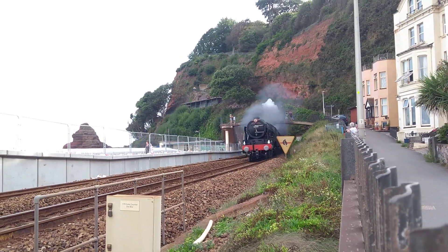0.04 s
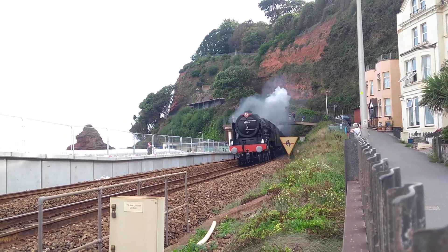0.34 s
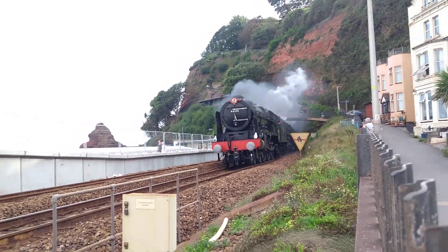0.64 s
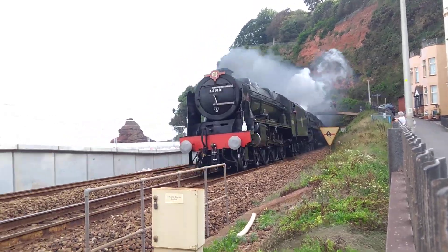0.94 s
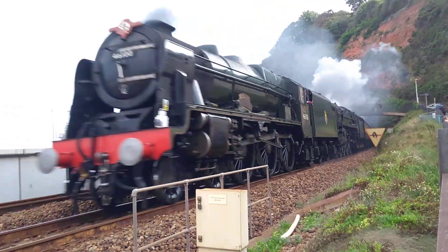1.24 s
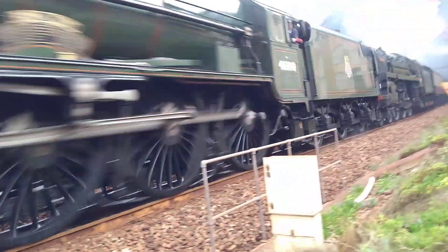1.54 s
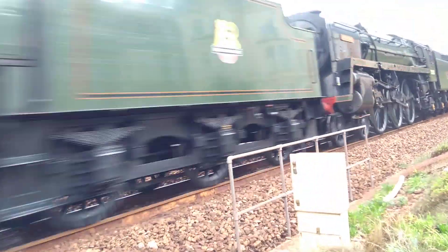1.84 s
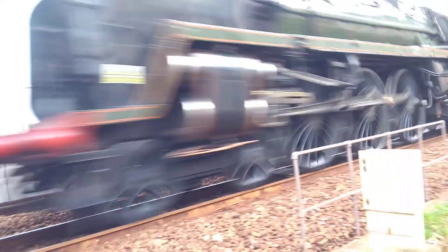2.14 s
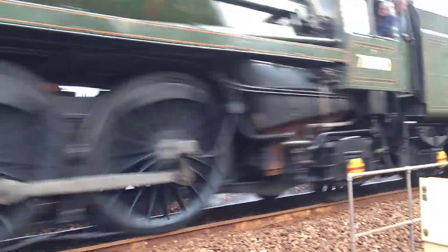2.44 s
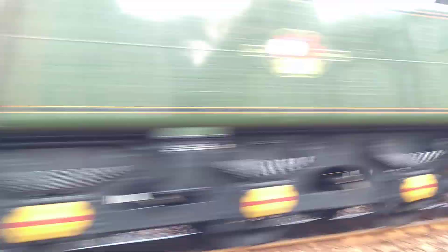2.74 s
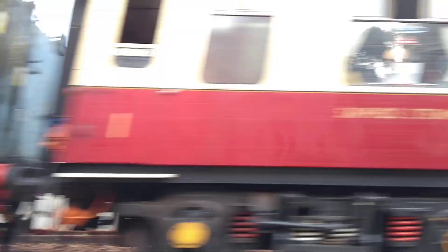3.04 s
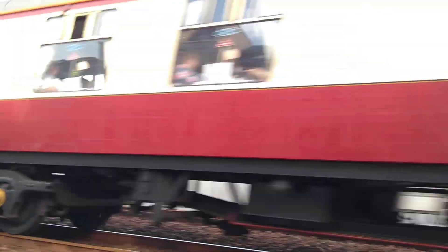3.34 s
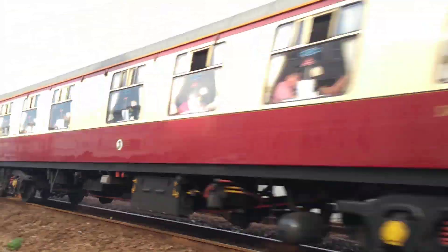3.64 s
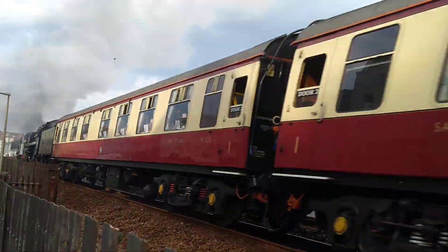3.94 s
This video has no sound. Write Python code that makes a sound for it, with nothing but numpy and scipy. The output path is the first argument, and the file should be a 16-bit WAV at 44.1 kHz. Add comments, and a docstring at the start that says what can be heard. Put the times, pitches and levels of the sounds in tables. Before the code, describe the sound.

A steam train passes close by, with a dense wheel roar, low rumble and surging steam hiss throughout. Rapid chuffs and a faint hum lead until about 1.3 seconds. The engines then rush past, mostly on the left, with rattling rods and sharp clanks up to about 2.3 seconds. From around 2.8 seconds a coach follows, its wheels clanking and ringing, the highest tones falling slightly in pitch.

```python
"""Two steam engines at the lineside

Coupled engines and their first coach rush past, a few metres from a hand-held stereo recorder.
Chimney beats and a faint hum come ahead of the train; then wheels roar on the rails, running gear
clanks and steam hisses in surges. Heavy frames rumble by, mostly on the left microphone, and the
highest rings of the coach wheels fall in pitch as they pass."""
import sys
import numpy as np
from scipy.fft import rfft, irfft
from scipy.io import wavfile

SR = 44100
rng = np.random.default_rng(int(sys.argv[2]) if len(sys.argv) > 2 else 0)


def to_wav(s):
    """Save 16-bit WAV."""
    ch = np.atleast_2d(s).T  # columns
    pcm = np.round(np.clip(ch, -1, 1) * 32767)  # PCM
    wavfile.write(sys.argv[1], SR, pcm.astype(np.int16))


N = 176400
TIME = np.arange(N) / SR
BIN_HZ = np.maximum(np.arange(N // 2 + 1) * SR / N, 1)

# Levels are relative, spectra give level per hertz, and pan is left minus right.
# wheels on the rails, from the lineside: (time [s], level [dB], pan [dB])
ROAR_PASS = [(0, -23, 8), (.12, -27, 4), (.3, -20.5, 3), (.53, -27, 2), (.75, -23, 2), (.97, -22.5, 1),
             (1.1, -21, 0.5), (1.42, -19.5, 3), (1.65, -18, 5), (1.85, -19, 6), (2.1, -21, 7.5),
             (2.4, -20.5, 3), (2.8, -21, 5.5), (3.0, -21.5, 5), (3.25, -18.5, 3.5), (3.5, -19, -0.5),
             (3.75, -20.5, -2.3), (3.87, -20, -4), (4, -20, -3)]
# centre of the roar: (time [s], frequency [Hz])
ROAR_CENTRE = [(0, 642.2), (1.3, 629), (1.75, 610), (2.4, 640.8), (3.0, 675.6), (4, 689)]
# the roar while centred on ROAR_REFERENCE_HZ: (frequency [Hz], level [dB])
ROAR_SPECTRUM = [(200, -22), (330, -15), (400, -9), (470, -3.5), (540, -0.5), (625, 0), (740, -5.5),
                 (880, -5), (1000, -8.5), (1120, -16.5), (1600, -25), (3000, -54)]
ROAR_REFERENCE_HZ = 640.7
# the coach is heard more directly than the engines: (time [s], left-right likeness [0-1])
ROAR_DIRECTNESS = [(0, 0.18), (2.4, 0.4), (3.2, 0.61), (4, 0.71)]

# rattle of rods and bogies: (time [s], level [dB]) and (frequency [Hz], level [dB])
RATTLE_PASS = [(0, -33), (.14, -33.5), (.28, -30.5), (.56, -33), (.75, -27.5), (1.0, -28.5), (1.5, -29),
               (1.64, -24), (1.72, -31), (1.95, -23), (2.06, -29), (2.16, -21), (2.26, -29.5),
               (2.42, -25.5), (2.76, -27.5), (3.22, -26), (3.4, -28.5), (3.65, -28), (4, -28.5)]
RATTLE_SPECTRUM = [(600, -39), (1100, -2), (1400, -2.5), (1800, 1), (2300, -3.5), (3200, -5.5), (6000, -38)]
# wheels strike the rails: (time [s], clank level [dB], clank decay [s], ring pitch [Hz], ring level [dB])
WHEEL_STRIKES = [(1.334, -19, 0.0091, 630, -19.5), (1.403, -19, 0.023, 550, -20.5),
                 (1.561, -14, 0.017, 840, -23), (1.624, -15, 0.032, 545, -16.5),
                 (1.694, -20, 0.0062, 545, -18), (1.728, -24, .02, 538, -15.5),
                 (1.818, -15.5, .019, 700, -23), (2.021, -22.5, 0.024, 650, -18),
                 (2.879, -16.5, 0.038, 630, -15.5), (3.049, -20.5, .021, 632, -18.5),
                 (3.231, -19, 0.023, 650, -22), (3.838, -15, .016, 660, -19.5),
                 (3.936, -15, .012, 700, -23), (3.972, -19, 0.019, 605, -19)]
# tone and position of the clanks: (frequency [Hz], level [dB]) and (time [s], pan [dB])
CLANK_SPECTRUM = [(120, -17.5), (350, -9.5), (600, 3), (850, -1), (1400, -23), (2200, -13), (6000, -47),
                  (14000, -37)]
STRIKE_PAN = [(1.3, 1), (2, 6), (3.2, 4.5), (3.8, -2)]
# coach wheel resonances: (width [Hz], rows of (time [s], frequency [Hz], level [dB]))
COACH_RESONANCES = [ (25, [(2.7, 1490, -54), (2.91, 1440, -32.5), (3.05, 1378, -25.5), (3.14, 1390, -36),
                    (3.24, 1375, -25), (3.35, 1330, -58)]), (14.1, [(3.2, 1240, -58), (3.36, 1217, -30),
                    (3.5, 1215, -39), (3.86, 1200, -30.5)]), (35, [(2.6, 880, -47), (2.95, 1011, -23.5),
                    (3.4, 1080, -55)]), (86, [(3, 680, -46), (3.25, 690.5, -27), (3.48, 745, -23.5),
                    (3.72, 730.3, -22.5), (3.87, 738.6, -19.5)])]

# escaping steam: (time [s], hiss level [dB], sizzle level [dB])
STEAM_SURGES = [(0, -29, -37), (.16, -29.5, -35), (.35, -27, -33), (.53, -30.5, -33), (.77, -25.5, -31.5),
                (.99, -28.5, -32), (1.22, -25.5, -30.5), (1.42, -26, -31), (1.48, -27.5, -34),
                (1.6, -27, -31.5), (1.71, -32, -34.5), (1.91, -25, -28), (2.05, -29, -32),
                (2.16, -25.5, -28), (2.28, -28.5, -34), (2.38, -26.5, -30.5), (2.62, -26, -29),
                (2.75, -27, -29.5), (2.84, -26.5, -26), (3.03, -29, -30.5), (3.1, -30, -32),
                (3.3, -29, -32.5), (3.4, -27, -28.5), (3.51, -31, -34), (3.68, -24.5, -29),
                (3.78, -30.5, -33.5), (4, -28.5, -32.5)]
# its hiss and the sizzle on top: (frequency [Hz], level [dB])
HISS_SPECTRUM = [(1000, 2), (2000, -9.5), (3200, 0), (4500, -1), (6200, -3), (8000, -6), (11000, -51),
                 (16000, -47)]
SIZZLE_SPECTRUM = [(4000, -67), (7000, -2.5), (9000, 0.5), (11800, 2.5), (13000, -2), (14200, -7.5),
                   (16000, -2)]
# chimney beats up the line: (level [dB]) of each in turn, and (frequency [Hz], level [dB])
BEAT_LEVELS = [-16, -22, -17, -20, -21, -16, -19, -16.5, -18, -19.5, -18.5]
BEAT_SPECTRUM = [(200, -20), (480, -6), (680, 1.5), (860, 5), (980, 1), (1200, -21), (3000, -34)]

# frames and tenders: (time [s], level [dB], pan [dB]) and (frequency [Hz], level [dB])
FRAME_PASS = [(0, -37, 2), (.12, -41.5, -6), (.3, -34.5, 7), (.52, -39.5, -3), (.9, -33.5, -3),
              (1.2, -34, 0), (1.4, -30.5, 4), (1.63, -30, 6), (1.71, -38, 10), (1.8, -27, 4),
              (2.05, -32.5, 5.5), (2.3, -28, 5), (2.6, -30, 9), (2.95, -29.5, 7), (3.3, -35.5, 7.5),
              (3.7, -34, 3), (4, -32.5, 0)]
FRAME_SPECTRUM = [(45, -32), (90, -9), (130, -5), (175, 0), (225, -1), (290, 0), (400, -0.5), (900, -40)]
# ground rumble underfoot: (time [s], level [dB]) and (frequency [Hz], level [dB])
GROUND_PASS = [(0, -47), (.11, -38), (.22, -42), (.45, -39.5), (.56, -45), (.66, -40), (.83, -41),
               (.95, -38.5), (1.33, -45), (1.5, -38.5), (2.0, -43.5), (2.35, -36.5), (2.65, -51),
               (2.85, -40), (3.0, -53), (3.23, -47), (3.7, -53), (4, -54)]
GROUND_SPECTRUM = [(20, -38), (33, -20), (45, -20), (57, -5), (68, -7.5), (95, -9), (160, -29), (500, -60)]
# hum ahead of the train: (frequency [Hz], level [dB])
HUM_TONES = [(345, -47), (612, -40.5), (683, -37), (1017, -38.5)]
# the recorder's stereo widening: (frequency [Hz], share into left [0-1], share into right [0-1])
MIC_CROSSFEED = [(690, 0.011, 0.013), (1170, 0.33, 0.8), (2110, 0.18, 0.21), (2300, 1, 1), (2670, 1, 1),
                 (2880, 0.22, 0.33), (3640, 0.49, 0.56), (5240, 0.2, 0.66), (6350, 0.15, 0.36),
                 (9000, 0.41, 0.28), (11400, 0.25, .08), (14000, 0.32, .3)]


def rolling_roar():
    """Rough wheels drive the rail resonances; the pitch sinks past the first engine, then lifts."""
    db, pan_db = in_time(ROAR_PASS)
    centre_hz, = in_time(ROAR_CENTRE)
    likeness, = in_time(ROAR_DIRECTNESS)
    position = np.cumsum(centre_hz / ROAR_REFERENCE_HZ)  # noise read faster sounds higher
    roar = [np.interp(position, np.arange(N), side, period=N) for side in noise(ROAR_SPECTRUM)]
    return place(roar, pan_db, likeness) * from_db(db + 0.44 * drift(rate_hz=53))


def running_gear():
    """Rods and bogies rattle close by, with single clanks after which a wheel rings on."""
    db, = in_time(RATTLE_PASS)
    rattle = noise(RATTLE_SPECTRUM) * from_db(db + 2.5 + 1.5 * drift(rate_hz=33))
    blows, rings = 0, 0
    for start, clank_db, decay_s, ring_hz, ring_db in WHEEL_STRIKES:
        blows += from_db(clank_db) * burst(start, attack_s=0.0018, decay_s=decay_s)
        tone = np.sqrt(2) * np.sin(2 * np.pi * (ring_hz * TIME + rng.random()))
        rings += from_db(ring_db) * burst(start, attack_s=0.0073, decay_s=0.043) * tone
    clanks = noise(CLANK_SPECTRUM)[0] * blows
    pan_db, = in_time(STRIKE_PAN)
    return rattle + (clanks + rings) * pan_gains(pan_db)


def steam():
    """Steam jets fill both microphones with hiss and a bright sizzle, each with its own flutter."""
    hiss_db, sizzle_db = in_time(STEAM_SURGES)
    hiss = place(noise(HISS_SPECTRUM), pan_db=2, likeness=0)
    hiss *= from_db(hiss_db + 3 + 0.7 * drift(rate_hz=17))
    sizzle = place(noise(SIZZLE_SPECTRUM), pan_db=-3.5, likeness=0)
    sizzle *= from_db(sizzle_db + 4 + 0.7 * drift(rate_hz=23))
    return hiss + sizzle


def coach_wheels():
    """Wheel resonances glide past the microphones: narrow rings over a broader, swelling howl."""
    rings = 0
    for width_hz, curve in COACH_RESONANCES:
        hz, db = in_time(curve)
        rings += resonance(hz, width_hz) * from_db(db)
    return place(rings, pan_db=2, likeness=0.94)


def exhaust(first_s=0.0244, period_s=0.1146):
    """The approaching chimney puffs in even time, stronger and weaker, a little to the left."""
    beats = 0
    for k, db in enumerate(BEAT_LEVELS):
        beats += from_db(db) * burst(first_s + k * period_s, attack_s=0.0074, decay_s=0.0097)
    return place(noise(BEAT_SPECTRUM), pan_db=5, likeness=0.29) * beats


def rumble():
    """The ground beside the track shakes under the weight; frames and tenders drone as they go by."""
    ground_db, = in_time(GROUND_PASS)
    frame_db, frame_pan_db = in_time(FRAME_PASS)
    ground = place(noise(GROUND_SPECTRUM), pan_db=1.5, likeness=0.76) * from_db(ground_db - 2)
    frames = place(noise(FRAME_SPECTRUM), frame_pan_db, likeness=0.36) * from_db(frame_db)
    return ground + frames


def hum(waver_hz=5.5, swell_db=3, first_swell_s=0.16, swell_period_s=0.47, end_s=1.4, fade_s=0.13):
    """Faint tones far to the left waver, swell and fade as the engine draws level."""
    tones = 0
    for hz, db in HUM_TONES:
        phase = 2 * np.pi * np.cumsum(hz + waver_hz * drift(rate_hz=24)) / SR
        tones += np.sqrt(2) * np.sin(phase) * from_db(db + 2.5 * drift(rate_hz=14))
    swell = from_db(swell_db * np.cos(2 * np.pi * (TIME - first_swell_s) / swell_period_s))
    fade = np.clip((end_s - TIME) / fade_s, 0, 1)
    return tones * swell * fade * pan_gains(pan_db=13.5)


def from_db(db):
    """Decibels to gain."""
    return 10 ** (np.asarray(db) / 20)


def unit_rms(x):
    """Scale to an rms of one."""
    return x / np.sqrt(np.mean(np.abs(x) ** 2) + 1e-20)


def in_time(rows):
    """Each column of a curve, at every sample."""
    times, *columns = np.transpose(rows)
    return [np.interp(TIME, times, column) for column in columns]


def in_frequency(rows):
    """Each column of a spectrum, at every bin."""
    hz, *columns = np.transpose(rows)
    return [np.interp(np.log(BIN_HZ), np.log(hz), column) for column in columns]


def drift(rate_hz):
    """Random wander of spread 1, mostly slower than rate_hz."""
    return unit_rms(irfft(rfft(rng.standard_normal(N)) / (1 + (BIN_HZ / rate_hz) ** 2), N))


def noise(spectrum):
    """Two unrelated noises of one spectrum, dying away beyond its ends."""
    db, = in_frequency(spectrum)
    low_hz, high_hz = spectrum[0][0], spectrum[-1][0]
    skirts = 1 / (1 + (BIN_HZ / high_hz / 2) ** 2) / (1 + (low_hz / BIN_HZ / 2) ** 2)
    white = rfft(rng.standard_normal((2, N)))
    return unit_rms(irfft(white * from_db(db) * skirts, N))


def resonance(hz, width_hz):
    """A narrow resonance kept going by random excitation, as two unrelated signals."""
    phase = 2 * np.pi * np.cumsum(hz) / SR
    return np.array([drift(width_hz) * np.cos(phase) + drift(width_hz) * np.sin(phase)
                     for _ in range(2)])


def burst(start, attack_s, decay_s):
    """A straight rise and an exponential fall."""
    age = TIME - start
    return np.clip(age / attack_s, 0, 1) * np.exp(-np.maximum(age - attack_s, 0) / decay_s)


def pan_gains(pan_db):
    """Gains at the left and right microphones."""
    return from_db(np.vstack([pan_db / 2, -pan_db / 2]))


def place(pair, pan_db, likeness):
    """Blend two unrelated signals into left and right, correlated by likeness."""
    mid = np.sqrt((1 + likeness) / 2) * pair[0]
    side = np.sqrt((1 - likeness) / 2) * pair[1]
    return np.array([mid + side, mid - side]) * pan_gains(pan_db)


def scene():
    """The whole train as it reaches the two microphones."""
    return rolling_roar() + rumble() + running_gear() + steam() + exhaust() + hum() + coach_wheels()


def record(dry):
    """The recorder subtracts each microphone, delayed, from the other, rounds peaks and cuts the top."""
    delay_s, cutoff_hz = 0.000392, 14250
    mics = rfft(dry)
    shares = np.array(in_frequency(MIC_CROSSFEED))
    opposite = mics[::-1] * np.exp(-2j * np.pi * BIN_HZ * delay_s)
    wide = irfft((mics - shares * opposite) / np.sqrt(1 + shares ** 2), N)
    rounded = wide / (1 + wide ** 6) ** (1 / 6)
    top_cut = np.clip((cutoff_hz - BIN_HZ) / 120 + 0.5, 0, 1)
    return irfft(rfft(rounded) * top_cut, N)


dry = scene()
out = record(dry)
to_wav(out)
```